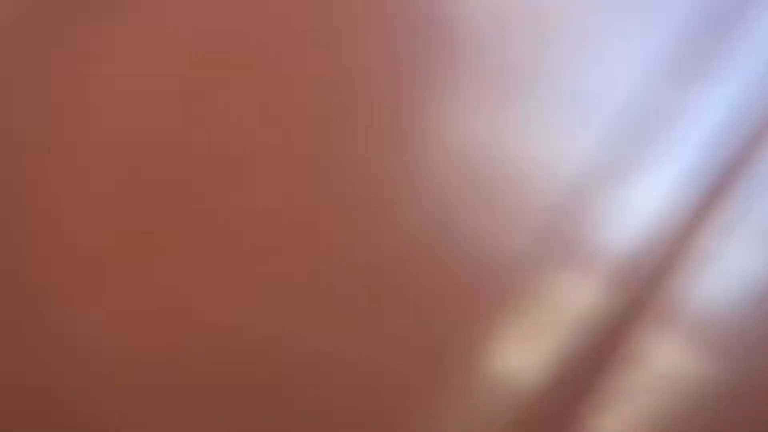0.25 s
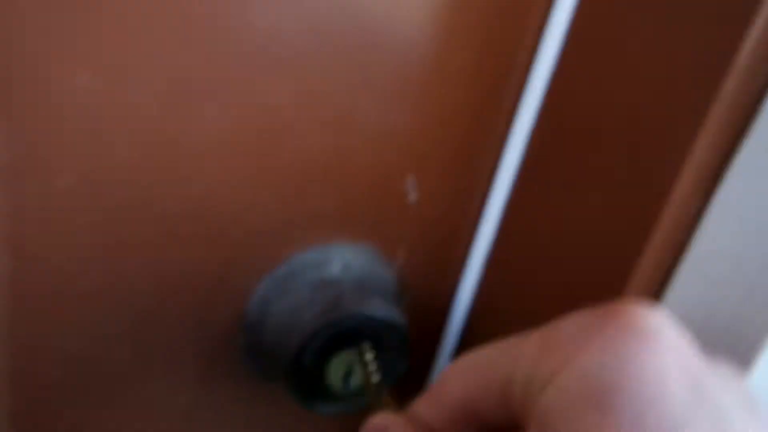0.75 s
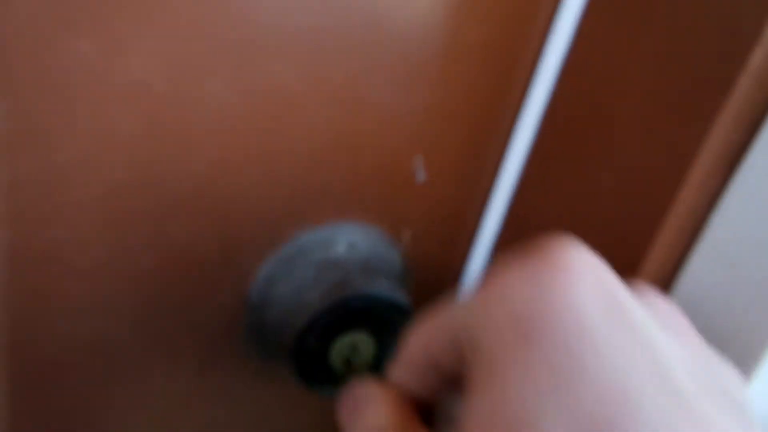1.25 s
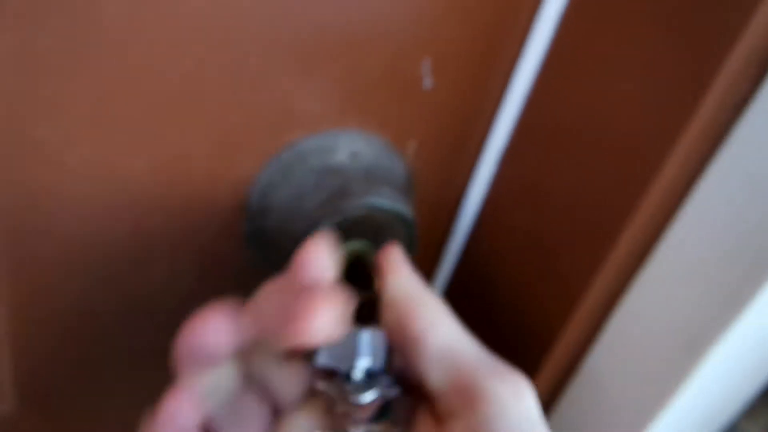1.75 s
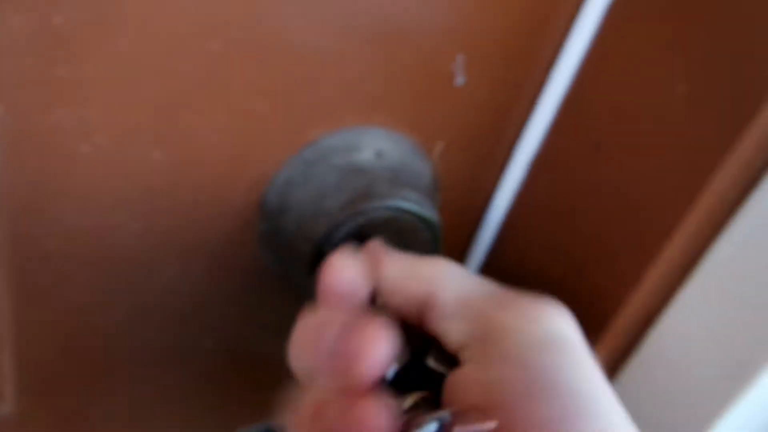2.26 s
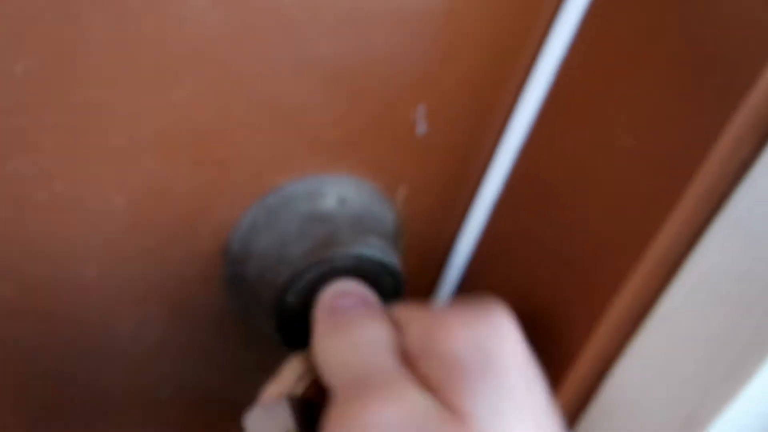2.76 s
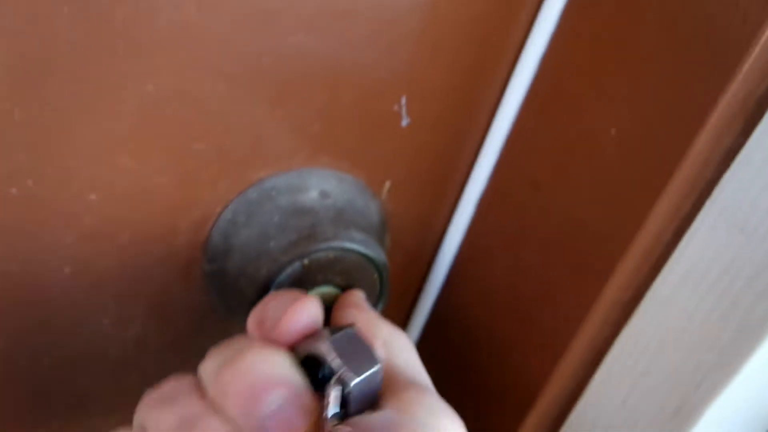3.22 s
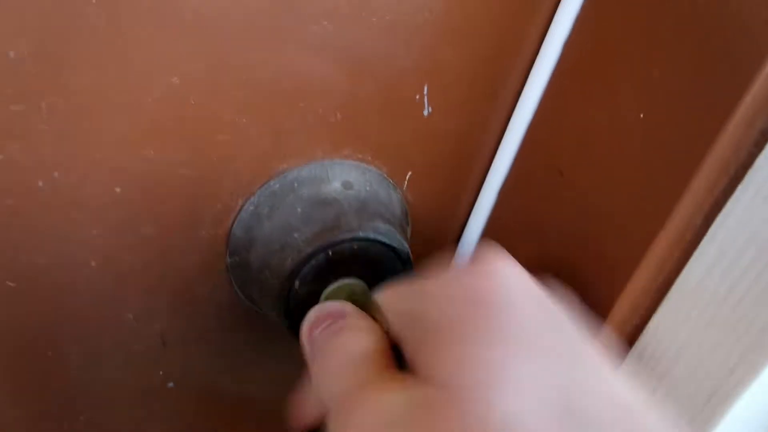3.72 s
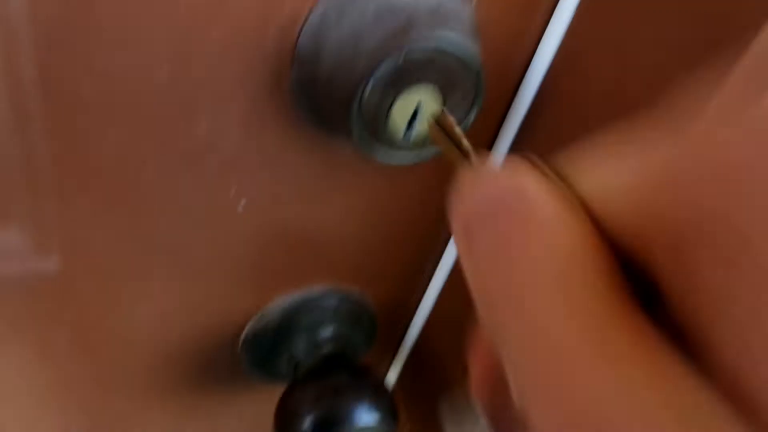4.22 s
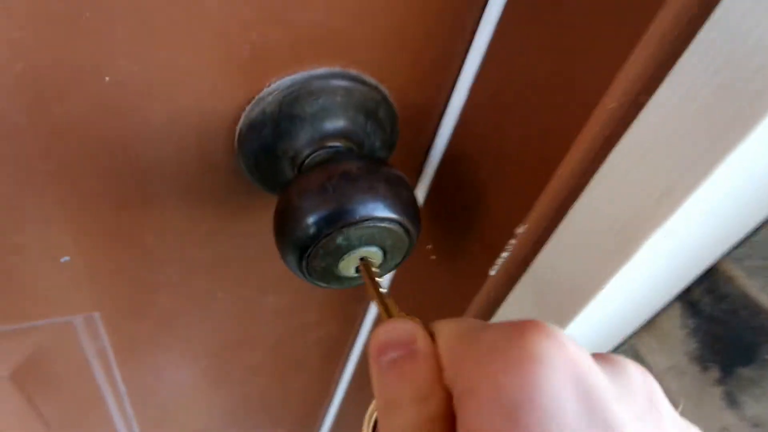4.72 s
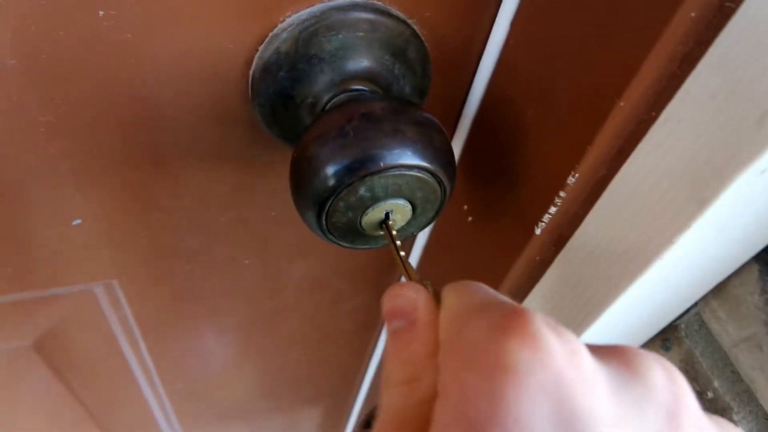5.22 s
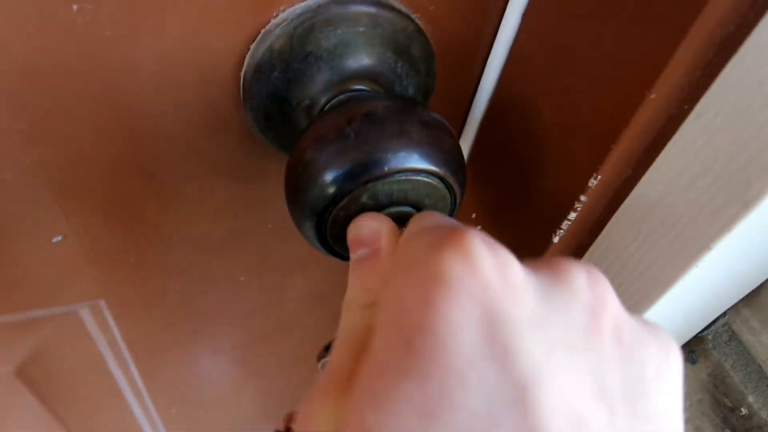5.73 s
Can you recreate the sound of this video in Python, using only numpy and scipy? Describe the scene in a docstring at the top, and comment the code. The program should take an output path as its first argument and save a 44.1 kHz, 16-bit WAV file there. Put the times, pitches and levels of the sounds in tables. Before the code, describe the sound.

Close up in a doorway, someone works a key in two locks of a wooden door. After a cloth swish and light taps, the key grinds into the deadbolt, which clicks, clacks and briefly squeaks, knocking faintly through the wood. The bunch of keys jingles lightly as fingers regrip. The key pulls out and rasps into the knob lock, ending on a sharp clack. Handling rumble and soft thumps on the microphone run underneath.

```python
"""A sleeve swishes and a key tip ticks on a wooden door's deadbolt, over hand rumble on a close camera.
The key works the bolt, then slides into the knob lock below: teeth rasp over snapping pins,
blows ring lock case and door, dry metal sticks and slips in brief squeaks.
The other keys chink on their ring as the fingers regrip. The doorway answers briefly."""
import sys
import numpy as np
from scipy import signal
from scipy.fft import rfft, irfft, next_fast_len
from scipy.io import wavfile
from scipy.ndimage import uniform_filter1d, map_coordinates

SR = 44100
rng = np.random.default_rng(int(sys.argv[2]) if len(sys.argv) > 2 else 0)


def put_to_file(sound):
    """Save the sound as 16-bit audio at rate SR, in the file named by the first command-line argument."""
    columns = np.atleast_2d(sound).T  # one column per channel
    safe = np.clip(columns, -1, 1)
    whole_steps = np.round(safe * 32767)
    wavfile.write(sys.argv[1], SR, whole_steps.astype(np.int16))


N = 263718
T = np.arange(SR // 3) / SR  # time axis of one blow, s

# hand movement: time_s, rumble_db, rubbing_db
HAND_EFFORT = [(0.0, -37, -47), (1.0, -41.5, -50), (1.43, -39, -43), (1.75, -43, -47.5), (1.8, -36, -42),
               (2.18, -35, -46.5), (2.93, -32, -41.5), (3.06, -42.5, -56), (3.55, -38, -49.5),
               (3.98, -33.5, -45), (4.2, -28.5, -50.5), (4.36, -40, -53.5), (4.76, -34, -47),
               (5.46, -33, -48), (5.59, -32.5, -44.5), (5.65, -30.5, -38.5), (5.88, -38.5, -53),
               (5.98, -48, -52.5)]
# blade along the keyway: start_s, end_s, rasp_start_db, rasp_end_db, tooth_gap_s, pin_db
KEY_STROKES = [(1.231, 1.3, -50.5, -53.5, .011, -36), (1.336, 1.411, -41, -36, .012, -48),
               (1.4056, 1.457, -35, -31, 0.019, -13.5), (2.584, 2.695, -41.5, -50, 0.026, -22),
               (4.045, 4.106, -27, -51, 0.014, -23), (4.195, 4.25, -34, -32, .0103, -18),
               (5.677, 5.758, -50.5, -29.5, 0.012, -20)]
# fingers take a new hold on the bunch: crest_s, half_length_s, level_db
REGRIPS = [(1.748, 0.041, -41.5), (1.862, 0.024, -45), (2.124, 0.066, -49.5), (2.378, 0.061, -49.5),
           (2.61, 0.04, -41), (2.839, 0.069, -45.5), (3.782, 0.11, -48)]
# modes: pitch_hz, level_db
LOCK_MODES = [(1015, -1), (1210, 4), (1400, 1), (1635, 6.5), (1880, 5), (2170, -13.5), (2370, -13),
              (2470, 4.5), (2690, -1.5), (2805, 6), (3295, -3), (3710, -1), (4010, -4), (4230, -3.5)]  # case and bolt
DOOR_MODES = [(130, -4.5), (175, 1), (255, 4.5), (410, -6.5), (462, -9.5), (535, -5), (605, -4), (880, -41)]  # wooden leaf
# spectra: freq_hz, level_db
CASE_SPECTRUM = [(300, -11.5), (800, -4), (1300, 4), (2500, 1.5), (4200, -2), (5500, -11), (9000, -15),
                 (16000, -30.5)]  # lock case
CRACK_SPECTRUM = [(500, -17.5), (3000, -16.5), (5000, -2.5), (7200, -7.5), (10000, 0), (14500, -1),
                  (16000, 1)]  # hard metal contact
HISS_SPECTRUM = [(300, -24), (1500, -1), (3000, -1), (6500, -4), (10000, -5.5), (14800, -1.5), (16000, -21)]  # fingers on keys, background hiss


def amp(db):
    """Decibels to gain."""
    return 10 ** (np.asarray(db) / 20)


def unit(x):
    """Scale to rms 1."""
    return x / np.sqrt(np.mean(x ** 2) + 1e-20)


def struck(x):
    """Scale a blow to rms 1 over its first 5 ms."""
    return x / np.sqrt(np.mean(x[:SR // 200] ** 2) + 1e-20)


def along(points, hz):
    """Read (freq_hz, value) points on a log axis."""
    freq_hz, values = np.transpose(points)
    return np.interp(np.log(hz + 1), np.log(freq_hz), values)


def curves(rows):
    """One value per sample for each column after the time."""
    time_s, *columns = np.transpose(rows)
    return [np.interp(np.arange(N) / SR, time_s, column) for column in columns]


def coloured(x, spectrum):
    """Filter x by a spectrum; rms 1."""
    size = next_fast_len(len(x) + 4096)
    gain = amp(along(spectrum, np.fft.rfftfreq(size, 1 / SR)))
    return unit(irfft(rfft(x, size) * gain, size)[:len(x)])


def wobble(rate_hz):
    """Smooth random curve, rate_hz knots a second."""
    knots = rng.standard_normal(int(N * rate_hz / SR) + 4)
    return map_coordinates(knots, [np.arange(N) * rate_hz / SR])


def patchy(depth_db):
    """Noise whose colour shifts as a rubbing contact moves."""
    spectra = signal.stft(rng.standard_normal(N), nperseg=256)[2]
    field = uniform_filter1d(rng.standard_normal(spectra.shape), size=6, axis=0)
    field = uniform_filter1d(field, size=9, axis=1)
    return signal.istft(spectra * amp(depth_db * unit(field)), nperseg=256)[1][:N]


def bell(t, half_s):
    """Bell-shaped gain, 1 at t = 0."""
    return 1 / np.cosh(np.clip(1.6 * t / half_s, -30, 30))


def swells(rows, fall_over_rise=0.89):
    """Gain of smooth movements, each rising to its crest and falling away."""
    t, gain = np.arange(N) / SR, np.zeros(N)
    for crest_s, half_s, db in rows:
        gain += amp(db) * bell(t - crest_s, np.where(t < crest_s, half_s, half_s * fall_over_rise))
    return gain


def envelope(t60_s, attack_s):
    """Quick rise, exponential decay."""
    return np.exp(-np.log(1000) * T / t60_s) * (1 - np.exp(-T / attack_s))


def burst(spectrum, t60_s, attack_s=0.00064):
    """Countless close modes dying together."""
    return struck(coloured(rng.standard_normal(len(T)), spectrum) * envelope(t60_s, attack_s))


def ring(modes, t60_s):
    """Distinct modes, struck at new strengths each time."""
    hz, db = np.transpose(modes)[:, :, None]
    gain = amp(db + 2.8 * rng.standard_normal(hz.shape))
    phase = 2 * np.pi * (hz * T + rng.random(hz.shape))
    return struck(np.sum(gain * np.sin(phase), axis=0) * envelope(t60_s, attack_s=0.00027))


def cluster(hz, width, t60_s):
    """Close modes round one pitch; width is a share of that pitch."""
    detune = np.fft.rfftfreq(len(T), 1 / SR) / hz - 1
    band = irfft(rfft(rng.standard_normal(len(T))) / (1 + (detune / width) ** 2), len(T))
    return struck(band * envelope(t60_s, attack_s=0.00077))


def add(track, start_s, sound):
    """Mix a sound into the track."""
    part = track[max(round(start_s * SR), 0):][:len(sound)]
    part += sound[:len(part)]


def hand():
    """The grip on the camera rumbles, rubs and bumps; each regrip rubs harder."""
    # freq_hz, level_db
    rumble_spectrum = [(10, -27), (22, -8), (33, 1.5), (55, -1), (100, -3), (170, -12.5), (260, -15),
                       (500, -67), (1500, -61)]
    skin_spectrum = [(100, 2), (250, 1), (500, 0), (800, -4.5), (1300, -7), (2000, -15.5), (4000, -24),
                     (9000, -34.5), (16000, -40.5)]
    # hand on door and camera: start_s, level_db, pitch_hz
    bumps = [(1.435, -15.5, 131), (2.073, -20.5, 143), (2.613, -15.5, 106), (2.938, -20, 108),
             (4.038, -13.5, 152), (4.19, -12, 127), (4.698, -21, 110.4), (4.912, -18.5, 113),
             (5.208, -14, 108), (5.368, -12.5, 142.4), (5.629, -14, 125), (5.667, -17, 170),
             (5.748, -13.5, 150)]
    rumble_db, rubbing_db = curves(HAND_EFFORT)
    rumble = coloured(amp(2 * wobble(20)) * rng.standard_normal(N), rumble_spectrum)
    skin = coloured(amp(2.2 * wobble(50)) * rng.standard_normal(N), skin_spectrum)
    rubbing = np.hypot(amp(rubbing_db + 2), amp(3.5) * swells(REGRIPS))
    out = amp(rumble_db + 1.5) * rumble + rubbing * skin
    for start_s, db, hz in bumps:
        thud = np.sin(2 * np.pi * hz * T) * envelope(t60_s=0.051, attack_s=0.0022)
        add(out, start_s + 0.00268, amp(db + 3) * thud + amp(db - 25.5) * ring(DOOR_MODES, t60_s=0.26))
    return out


def hiss(mean_db=-60, db_per_rubbing_db=0.45):
    """Faint hiss, a little louder while the hand is busy."""
    _, rubbing_db = curves(HAND_EFFORT)
    level_db = mean_db + db_per_rubbing_db * (rubbing_db - rubbing_db.mean())
    return amp(level_db) * coloured(rng.standard_normal(N), HISS_SPECTRUM)


def sleeve():
    """Cloth slides past as the hand comes up to the door."""
    # crest_s, half_length_s, level_db
    swishes = [(0.051, 0.017, -32.5), (.28, 0.39, -43.5), (.577, 0.025, -30.5), (.675, 0.032, -42.5)]
    # freq_hz, level_db
    cloth_spectrum = [(300, -23), (1500, -5.5), (3000, -5), (5000, -6), (6800, -3.5), (7800, -3.5),
                      (9500, -2), (12000, -5), (14500, -1.5), (16000, -6)]
    return swells(swishes) * coloured(amp(1.2 * wobble(900)) * patchy(depth_db=1.5), cloth_spectrum)


def tick(db, lock_db, hz):
    """Tiny hard contact: a short tinted snap that barely wakes the lock."""
    snap = burst(CRACK_SPECTRUM, t60_s=0.0039, attack_s=0.0004)
    snap += amp(-10.5) * burst(CRACK_SPECTRUM, t60_s=0.043)
    tint = cluster(hz, width=0.1, t60_s=0.014)
    body = burst(CASE_SPECTRUM, t60_s=0.026) + amp(-6) * ring(LOCK_MODES, t60_s=0.026)
    return amp(db - 9.5) * snap + amp(db - 24) * tint + amp(lock_db - 16) * body


def key_taps():
    """Key tip and ring tap against the lock."""
    # start_s, level_db, lock_db, pitch_hz
    taps = [(0.0579, -13, -29, 14400), (0.07, -21, -44, 14500), (0.0903, -21.5, -44, 13700),
            (0.1266, -22, -31, 14200), (0.2449, -14, -29, 6100), (0.3037, -25, -49, 13500),
            (0.348, -24, -47, 14400), (0.3834, -24, -39, 13100), (0.92, -43, -29.5, 5100),
            (1.1757, -39, -23.5, 1700), (1.6816, -23.5, -31, 13100), (1.7507, -16, -28, 12500),
            (1.9054, -26.5, -24, 11500), (1.9774, -25, -50, 6840), (2.1061, -23.5, -34, 10100),
            (2.582, -5.5, -22, 14100), (2.764, -25, -21, 12100), (2.9015, -26.5, -22, 14500),
            (3.2198, -53, -32, 1498), (3.5748, -29.5, -46, 13700), (3.717, -29, -22, 14500),
            (3.8383, -25, -32, 13800), (4.4718, -32, -49, 13600), (5.015, -50.5, -35, 1500),
            (5.5541, -31, -22.5, 4800), (5.656, -22, -27, 4700), (5.7614, -4.5, -9, 11200)]
    out = np.zeros(N)
    for start_s, db, lock_db, hz in taps:
        add(out, start_s, tick(db, lock_db, hz))
    return out


def bolt_clacks():
    """Each blow of key or bolt cracks, rings the lock and the struck part, and shakes the door."""
    # start_s, lock_db, door_db, crack_db, part_hz, part_db
    blows = [(0.7884, -33.5, -30, -15, 464.5, -37), (1.038, -18, -24.5, -31, 1900, -31.5),
             (1.0603, -11, -26.5, -36, 1740, -36), (1.2234, -37, -25, -45, 1890, -35),
             (1.239, -24, -26, -28, 340, -24), (1.282, -10.5, -27.5, -22, 1890, -28.5),
             (1.4399, -4.5, -22, -9, 1860, -23), (1.6203, -10.5, -29.5, -18.5, 3450, -25.5),
             (2.0076, -17, -31, -27, 1410, -48), (2.3884, -19, -35, -25, 1710, -32),
             (2.7447, -15.5, -40, -28, 2520, -25), (2.8539, -19, -35.5, -52, 1350, -25),
             (2.9447, -9.5, -24, -8, 1156, -15.5), (3.0121, -6.5, -19.5, -10.5, 2460, -25.5),
             (3.27, -8, -38.5, -17.5, 2267, -15), (3.4232, -0.5, -20.5, -1, 2560, -13.5),
             (3.8531, -17, -64.5, -23, 3460, -36.5), (4.0473, -7.5, -53, -20, 1560, -23),
             (4.0537, -7.5, -22, -3, 1560, -28), (4.0939, -12, -23, -15, 3240, -26),
             (4.1968, -24, -22, -15, 1300, -45), (4.247, -7, -34, -1, 2580, -25),
             (4.928, -28, -32.5, -46.5, 1343, -36.5), (5.1265, -24.5, -34, -32, 1462, -33.5),
             (5.4483, -19, -18, -19, 1630, -27.5), (5.9615, -9, -25, -4, 1870, -25)]
    # freq_hz, level_db
    wood_spectrum = [(50, -5.5), (130, 7), (500, 6), (900, -1.5), (1600, -32.5), (5000, -46.5)]
    out = np.zeros(N)
    for start_s, lock_db, door_db, crack_db, part_hz, part_db in blows:
        case = burst(CASE_SPECTRUM, t60_s=0.081, attack_s=0.00041) + burst(CASE_SPECTRUM, t60_s=0.0048)
        lock = amp(-6.5) * case + amp(-10) * ring(LOCK_MODES, t60_s=0.08)
        part = cluster(part_hz, width=0.15, t60_s=0.052) + amp(-7.5) * ring([(part_hz, 0)], t60_s=0.027)
        door = burst(wood_spectrum, t60_s=0.15, attack_s=0.0017) + ring(DOOR_MODES, t60_s=0.13)
        crack = burst(CRACK_SPECTRUM, t60_s=0.014, attack_s=0.00067)
        metal = amp(lock_db - 12) * lock + amp(part_db - 2) * part + amp(crack_db - 10) * crack
        add(out, start_s, metal + amp(door_db - 7.5) * door)
    return out


def brass_pings():
    """Freely struck brass rings on in a tight cluster of modes."""
    # start_s, pitch_hz, level_db
    pings = [(.789, 5100, -38), (.79, 7550, -37), (3.013, 6950, -35), (3.014, 4150, -25),
             (3.424, 4100, -24)]
    out = np.zeros(N)
    for start_s, hz, db in pings:
        add(out, start_s, amp(db) * cluster(hz, width=0.058, t60_s=0.054))
    return out


def key_rasp():
    """Teeth grind over the pins in quick uneven catches, which lock case and door pick up."""
    # freq_hz, level_db
    rasp_spectrum = [(100, 23.5), (250, 17), (500, 14), (900, -1.5), (1800, 7), (3500, 5.5), (6500, 3.5),
                     (10000, 3), (14500, 9), (16000, 2)]
    t, force = np.arange(N) / SR, np.zeros(N)
    for start_s, end_s, start_db, end_db, _, _ in KEY_STROKES:
        contact = np.clip((t - start_s) / 0.0043, 0, 1) * np.clip((end_s - t) / 0.0058, 0, 1)
        force += contact * amp(np.interp(t, [start_s, end_s], [start_db, end_db]))
    catches = amp(2.5 * wobble(250) + 2.7 * wobble(1500)) * rng.standard_normal(N)
    lock = unit(signal.fftconvolve(catches, ring(LOCK_MODES, t60_s=0.042))[:N])
    door = signal.fftconvolve(force * catches, ring(DOOR_MODES, t60_s=0.16) / SR ** 0.5)[:N]
    return force * (amp(8) * coloured(catches, rasp_spectrum) + amp(-2) * lock) + amp(18.5) * door


def pin_clicks(max_teeth=8, pitch_hz=4350, growth_db=3):
    """A pin snaps down behind each passing tooth and rings, harder towards the stroke's end."""
    out = np.zeros(N)
    for start_s, end_s, _, _, tooth_gap_s, pin_db in KEY_STROKES:
        times_s = start_s + tooth_gap_s * np.arange(max_teeth)
        for snap_s in times_s[times_s < end_s - 0.005]:
            depth = (snap_s - start_s) / (end_s - start_s)
            db = pin_db + growth_db * (depth - 0.5)
            ringing = amp(db - 24) * cluster(pitch_hz, width=0.062, t60_s=0.032)
            add(out, snap_s, tick(db, lock_db=db - 2, hz=pitch_hz) + ringing)
    return out


def key_chinks():
    """Held keys touch and ring high and briefly."""
    # start_s, level_db, pitch_hz
    touches = [(1.268, -21, 13000), (1.3612, -6.5, 13200), (1.3857, -5, 13500), (2.026, -19, 14600),
               (2.0772, -19, 14000), (2.372, -18, 14900), (2.8185, -19, 12300), (3.744, -11, 14000),
               (3.8297, -17, 13900), (4.052, -1.5, 13000), (4.344, -33.5, 8800), (4.6103, -27, 9780)]
    out = np.zeros(N)
    for start_s, db, hz in touches:
        blade = cluster(hz, width=0.075, t60_s=0.018) + amp(-12) * ring([(hz, 0)], t60_s=0.07)
        add(out, start_s, amp(db - 14) * blade + amp(db - 42) * burst(CRACK_SPECTRUM, t60_s=0.009))
    return out


def bolt_squeaks():
    """Dry metal sticks and slips: a brief whistle climbs as it grips, then the part rings faintly."""
    # crest_s, pitch_hz, level_db, swell_s, roughness_rad
    squeaks = [(1.626, 3633, -22, 0.0052, 0.33), (1.63, 8270, -32, 0.012, 1.5),
               (3.2845, 6475, -2, .003, .1), (3.86, 3720, -26, 0.011, 1.1)]
    out, t = np.zeros(N), T - T.mean()
    for crest_s, hz, db, swell_s, roughness_rad in squeaks:
        flatness = 0.035 / (1 + np.exp(np.clip(2 * t / swell_s + 2, -30, 30)))
        phase = 2 * np.pi * np.cumsum(hz * (1 - flatness)) / SR + roughness_rad * wobble(600)[:len(T)]
        whistle = np.sin(phase) + amp(-21.5) * np.sin(2 * phase)
        add(out, crest_s - T.mean(), amp(db) * bell(t, swell_s) * whistle)
        add(out, crest_s, amp(db - 52) * cluster(hz, width=0.012, t60_s=0.35))
    return out


def fingers():
    """At each regrip fingertips and keys rub with a grainy, shifting hiss."""
    grains = amp(2 * wobble(90) + 2.5 * wobble(1200))
    return amp(2.5) * swells(REGRIPS) * coloured(grains * patchy(depth_db=5.5), HISS_SPECTRUM)


def key_jingle(grazes=8, range_db=10, spread_half_lengths=1.2):
    """At each regrip the hanging keys graze at random: dry snaps, each with its own tint."""
    out = np.zeros(N)
    for crest_s, half_s, db in REGRIPS:
        for k, (jitter, height, force) in enumerate(rng.random(size=(grazes, 3))):
            offset = 2 * (k + jitter) / grazes - 1  # -1..1 about the crest
            hz = 4500 * (15000 / 4500) ** np.sqrt(height)
            snap = burst(CRACK_SPECTRUM, t60_s=0.008, attack_s=0.0004)
            tint = cluster(hz, width=0.12, t60_s=0.02)
            gain = amp(db - 2 + range_db * force ** 2 - 5 * abs(offset))
            add(out, crest_s + spread_half_lengths * half_s * offset, gain * (snap + 0.5 * tint))
    return out


def doorway(x):
    """Short reverberation of door frame and walls, 5 ms late."""
    # freq_hz, t60_s
    decay_times = [(150, 0.25), (1000, 0.4), (4000, 0.047), (7000, 0.1), (14000, 0.033)]
    hz, t, spectra = signal.stft(rng.standard_normal(SR // 2), SR, nperseg=256)
    decay = amp(-60 * t / along(decay_times, hz)[:, None])
    tail = signal.istft(spectra * decay, SR, nperseg=256)[1]
    return signal.fftconvolve(x, np.pad(tail / np.linalg.norm(tail), (SR // 200, 0)))[:N]


def scene():
    """The lock in its doorway, over handling noise; mono."""
    lock = key_taps() + bolt_clacks() + brass_pings() + key_rasp() + pin_clicks()
    metal = lock + key_chinks() + bolt_squeaks() + key_jingle()
    handling = hand() + hiss() + sleeve() + fingers()
    return (metal + amp(-20) * doorway(metal) + handling)[None]


def record(dry):
    """The camera rounds off the highest peaks and cuts the top treble."""
    ceiling, cutoff_hz = 0.85, 15300
    rounded = dry / (1 + np.abs(dry / ceiling) ** 4) ** (1 / 4)
    return signal.sosfilt(signal.ellip(10, 0.2, 80, cutoff_hz, fs=SR, output="sos"), rounded)


dry = scene()
out = record(dry)
put_to_file(out)
```